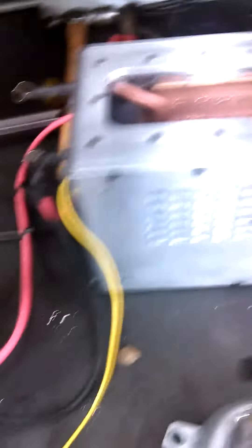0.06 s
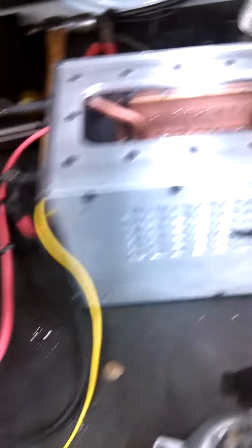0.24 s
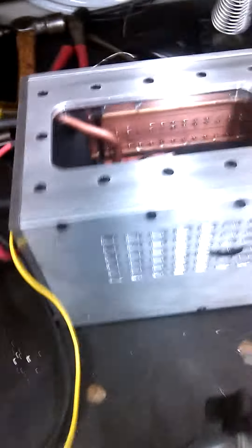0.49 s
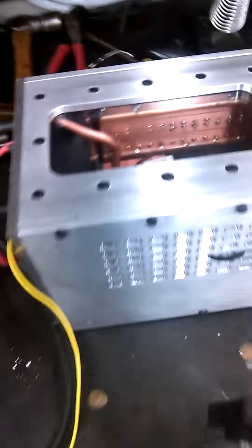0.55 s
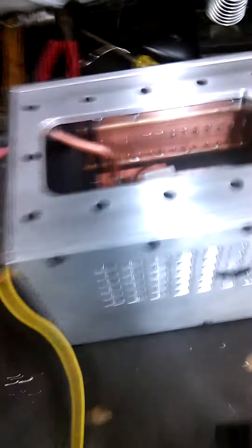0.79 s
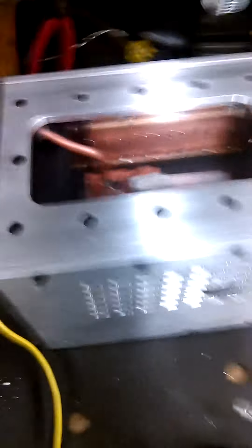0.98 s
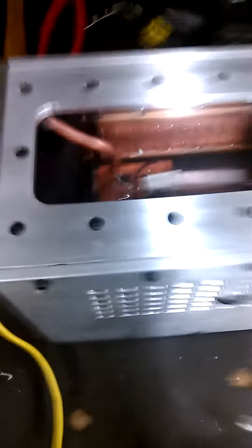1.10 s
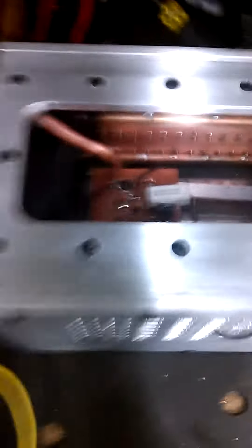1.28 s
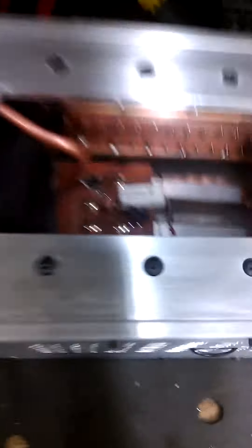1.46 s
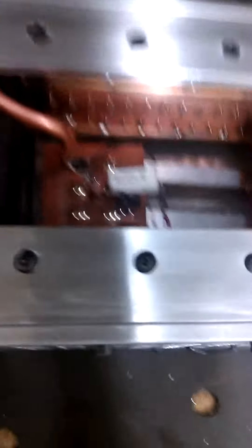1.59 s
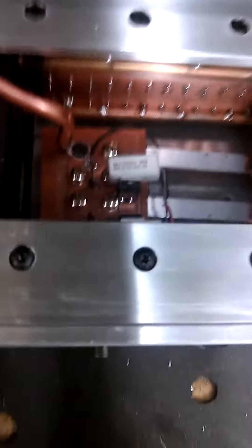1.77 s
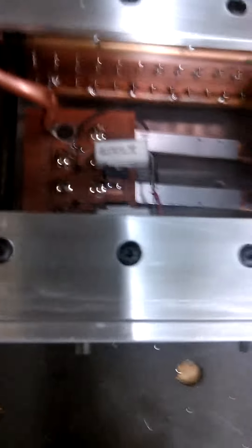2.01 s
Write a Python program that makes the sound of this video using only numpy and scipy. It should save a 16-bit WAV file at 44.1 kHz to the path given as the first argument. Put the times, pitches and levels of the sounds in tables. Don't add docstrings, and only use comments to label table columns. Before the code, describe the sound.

A small fan whines at a steady mid pitch over rushing air, with one hard knock early

```python
import sys
import numpy as np
from scipy import signal
from scipy.fft import rfft, irfft, next_fast_len
from scipy.io import wavfile
from scipy.ndimage import uniform_filter1d, map_coordinates

SR = 44100
rng = np.random.default_rng(int(sys.argv[2]) if len(sys.argv) > 2 else 0)


def put_to_file(sound):
    columns = np.atleast_2d(sound).T
    safe = np.clip(columns, -1, 1)
    whole_steps = np.round(safe * 32767)
    wavfile.write(sys.argv[1], SR, whole_steps.astype(np.int16))


def boost(x):
    u = np.asarray(x, float) / 20
    return 10 ** u


N = 90404
t = np.arange(N) / SR


def unit(x):
    return x / np.sqrt(np.mean(x ** 2) + 1e-20)


def wobble(rate):
    knots = rng.standard_normal(int(N * rate / SR) + 4)
    return map_coordinates(knots, [np.arange(N) * rate / SR])


def sine(phase):
    return np.sqrt(2) * np.sin(phase + rng.uniform(0, 2 * np.pi))


def filtered(x, response):
    edge = 4096
    wide = np.pad(np.ravel(x), edge, mode="reflect")
    size = next_fast_len(len(wide) + SR)
    spectrum = rfft(wide, size) * response(np.fft.rfftfreq(size, 1 / SR))
    return irfft(spectrum, size)[edge:edge + N].reshape(np.shape(x))


def peak(centre_hz, wide_hz):
    return lambda f: 1j * f * wide_hz / (centre_hz ** 2 - f * f + 1j * f * wide_hz)


def peaks(table, f):
    return sum(share * abs(peak(centre, wide)(f)) ** 2 for centre, wide, share in table)


def rush(points, below_db, above_db, patchy_db):
    grains = signal.stft(rng.standard_normal(N), nperseg=512)[2]
    patches = uniform_filter1d(rng.standard_normal(grains.shape), size=6, axis=0)
    patches = uniform_filter1d(patches, size=14, axis=1)
    noise = signal.istft(grains * boost(patchy_db * unit(patches)), nperseg=512)[1][:N]
    hz, db = np.transpose(points)

    def colour(f):
        octave = np.log2(f + 1)
        below = below_db * np.clip(np.log2(hz[0]) - octave, 0, None)
        above = above_db * np.clip(octave - np.log2(hz[-1]), 0, None)
        return boost(np.interp(octave, np.log2(hz), db) - below - above)
    return unit(filtered(noise, colour))


# time in seconds, pitch in Hz, level in dB.
BLADE_TONE = [
    (0.02, 887.5, -39),
    (0.372, 886.4, -37.5),
    (0.466, 884.8, -40),
    (1.072, 884, -35),
    (2.0, 884.6, -35),
]
# multiple of the shaft rate, dB re the blade tone, growth with nearness in dB per dB.
SHAFT_ORDERS = [(8, -31, .1), (12, -24.5, 1.7), (14, -29, 4), (16, -32.5, .2), (21, -46, .5),
                (28, -40.5, .3)]
# pitch in Hz, level in dB.
WINDING_WHINE = [(2804, -80), (2851, -80), (3024, -76), (3109, -83), (3236, -80), (3327, -79), (3455, -83),
                 (3629, -80), (4423, -86)]


def fan():
    blades = 7
    s, hz, db = np.transpose(BLADE_TONE)
    tone_db = np.interp(t, s, db)
    near_db = tone_db - tone_db.mean()
    blade_hz = np.interp(t, s, hz) + 0.38 * wobble(11.99)
    shaft = 2 * np.pi * np.cumsum(blade_hz) / SR / blades
    tone = boost(-0.5 * wobble(27)) * sine(blades * shaft)
    skirt = unit(filtered(rng.standard_normal(N), lambda f: peak(hz.mean(), 109)(f) ** 2))
    sound = boost(tone_db) * (tone + boost(-17) * skirt)
    for multiple, below_db, grows in SHAFT_ORDERS:
        order_db = tone_db.mean() + below_db + grows * near_db + 1.3 * wobble(5.78)
        sound = sound + boost(order_db) * sine(round(multiple) * shaft)
    for pitch, level in WINDING_WHINE:
        whine_db = level + 0.9 * near_db + 2.6 * wobble(3.7)
        sound = sound + boost(whine_db) * sine(2 * np.pi * pitch * t)
    return sound


# frequency in Hz, level in dB per Hz.
AIR_SPECTRUM = [(500, 0), (900, 1), (1400, -3.5), (2000, -13.5), (3500, -19), (7000, -26.5), (10000, -34),
                (14000, -37.5)]
# time in seconds, share of sound over the window [0-1], airflow in dB.
VIEW_PATH = [
    (0, 0.37, -1.5),
    (0.298, 0.08, 1),
    (0.799, 0.25, .1),
    (1.15, 0.44, 0.2),
    (1.6, 0.96, -0.3),
    (2.05, .95, -0.5),
]
# centre in Hz, width in Hz, depth [0-1, negative lifts].
BENCH_DIPS = [(2440, 230, 0.25), (4840, 700, 0.73), (7750, 1600, 0.72), (8500, 700, -.3),
              (6000, 1700, -.15)]
# centre in Hz, width in Hz, lift [0-1, negative dips].
CAVITY_PEAKS = [(2460, 350, -.4), (2890, 320, 0), (4080, 270, .3), (4900, 540, 0.7), (5700, 230, -.3),
                (6740, 380, 0.2), (7350, 590, 0.5), (8800, 500, 0.4)]


def airflow():
    s, share, db = np.transpose(VIEW_PATH)
    over = np.clip(np.interp(t, s, share), 0, 1)
    air = rush(AIR_SPECTRUM, 21, 6, patchy_db=1.5)
    side = filtered(air, lambda f: 1 - peaks(BENCH_DIPS, f))
    top = filtered(air, lambda f: 1 + peaks(CAVITY_PEAKS, f))
    level_db = -48.5 + np.interp(t, s, db) + 0.4 * wobble(2)
    return boost(level_db) * ((1 - over) * side + over * top)


# pitch in Hz, level in dB, wander
# in Hz.
ROOM_DRONES = [(58, -50, 2.2), (103, -58.5, 4), (273.6, -59, 5.04), (361.7, -66.5, 4)]


def drones():
    sound = np.zeros(N)
    for hz, db, wander in ROOM_DRONES:
        phase = 2 * np.pi * np.cumsum(hz + wander * wobble(7)) / SR
        sound += boost(db + 1.4 * wobble(4.86)) * np.sqrt(2) * np.sin(phase)
    return sound


# frequency in Hz, level in dB per Hz.
RUMBLE_SPECTRUM = [(42, -8.5), (58, -9.5), (80, -9), (110, -7.5), (200, -13.5), (300, -10), (480, -12.5),
                   (700, -22.5)]
# time in seconds, lift in dB, length in seconds.
RUMBLE_SURGES = [
    (.33, 4, .04),
    (.53, 3, .04),
    (.755, 7, .035),
    (.92, -4, .08),
    (1.19, 3, .03),
    (1.43, 7, .06),
    (1.61, 4, .04),
    (1.86, 5, .06),
    (2.0, -7, .03),
]


def workshop():
    surge_db = sum(db * np.exp(-((t - s) / length) ** 2) for s, db, length in RUMBLE_SURGES)
    rumble = rush(RUMBLE_SPECTRUM, 4, 10.9, patchy_db=0.33)
    low = filtered(rumble, lambda f: 1 / (1 + (f / 140) ** 4))
    surging = rumble + low * (boost(surge_db) - 1)
    return boost(-43) * surging + boost(0.81 * surge_db) * drones()


# time in seconds, step height in full scale, rise in samples.
JOLT_STEPS = [
    (.22034, .08, 2),
    (.220922, .86, 1.3),
    (.23313, .018, 2),
    (.24101, -.013, 2),
]


def jolt():
    return sum(height * np.clip((t - s) * SR / rise + 0.5, 0, 1) for s, height, rise in JOLT_STEPS)


def duck():
    since = t - JOLT_STEPS[1][0]
    return boost(-10 * np.exp(-np.abs(since) / 0.011) * (since > 0))


# time in seconds, peak in dB, 60 dB decay time in seconds.
CASE_TICKS = [
    (1.116, -49, .03),
    (1.124, -53, .02),
    (1.358, -49, .03),
    (1.367, -49, .03),
]


def ticks():
    shape = np.zeros(N)
    for s, db, t60 in CASE_TICKS:
        shape += boost(db - 60 * np.clip(t - s, 0, None) / t60) * (t >= s)
    return filtered(shape * rng.standard_normal(N), lambda f: peak(3900, 3000)(f) ** 2)


def scene():
    room = fan() + airflow() + workshop()
    return (room * duck() + jolt() + ticks())[None]


def roll_off(x):
    return signal.sosfilt(signal.butter(12, 15100, fs=SR, output="sos"), x)


# corner in Hz, Q.
LOW_CUT_STAGES = [(27.4, 1.69), (76.6, .83), (51.4, 2.31)]


def record(dry):
    coupling_hz, top_hz, edge_hz = 22.7, 14300, 250

    def chain(f):
        stages = [-f * f / (c * c - f * f + 1j * f * c / q) for c, q in LOW_CUT_STAGES]
        coupling = 1j * f / (coupling_hz + 1j * f)
        summing = 1 / (1 - np.exp(-2j * np.pi * f / SR) + 1e-12)
        band = np.clip((top_hz - f) / edge_hz + 0.5, 0, 1)
        return np.prod(stages, axis=0) * coupling * summing * band
    finished = filtered(np.diff(dry, prepend=0), chain)
    return roll_off(finished)


dry = scene()
out = record(dry)
put_to_file(out)
```